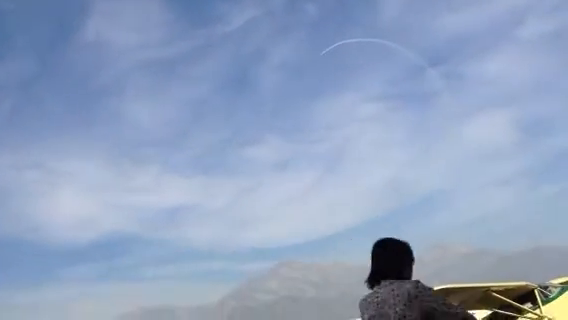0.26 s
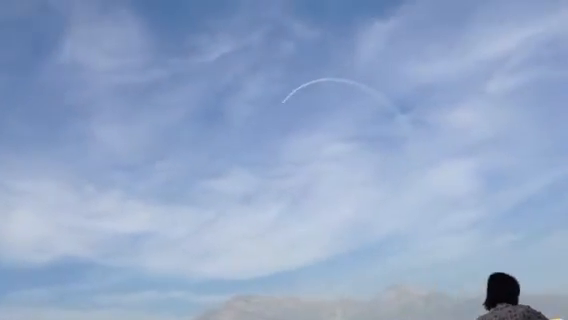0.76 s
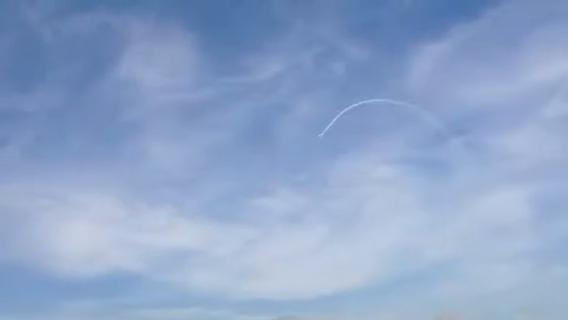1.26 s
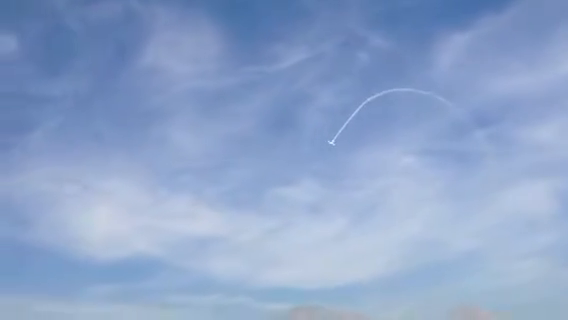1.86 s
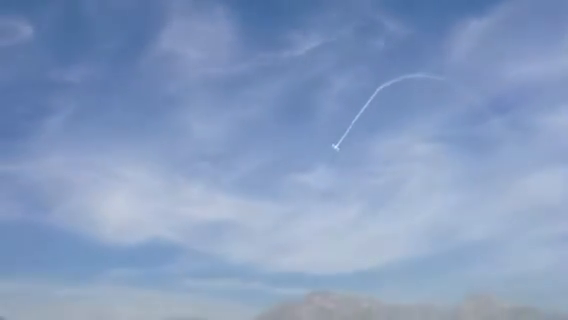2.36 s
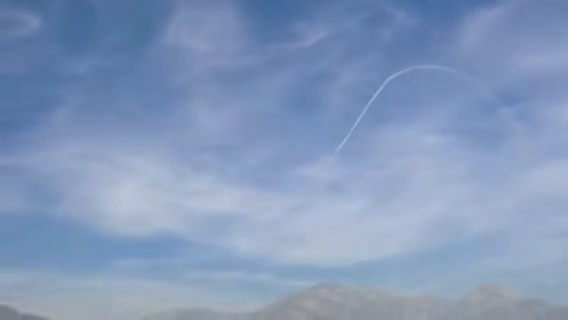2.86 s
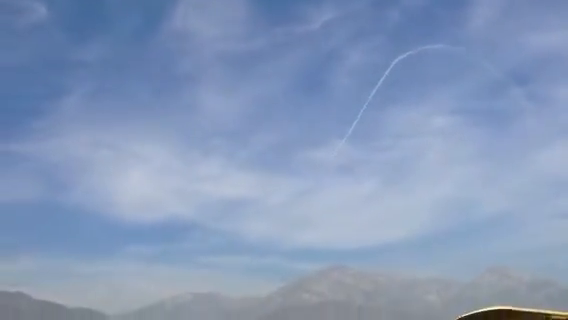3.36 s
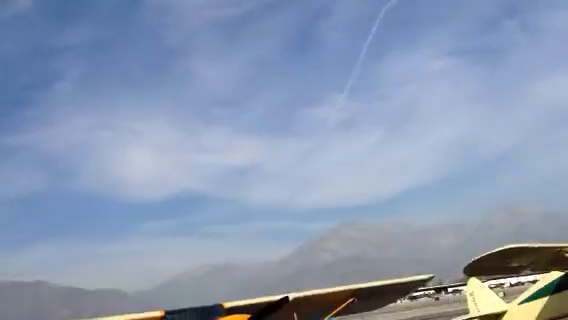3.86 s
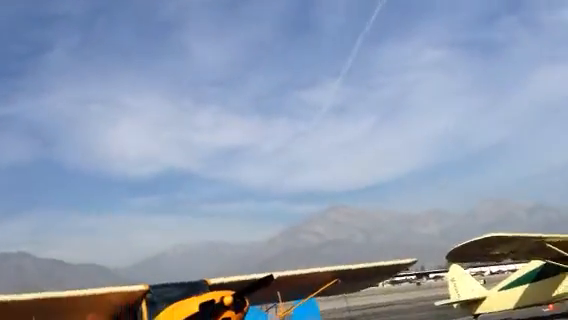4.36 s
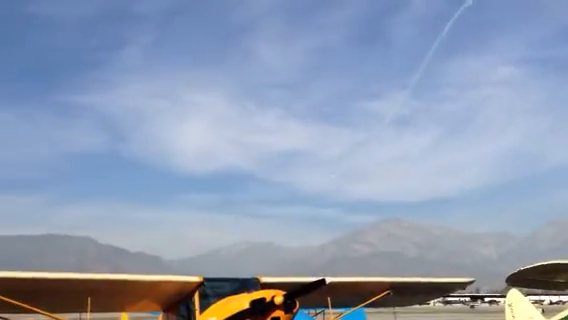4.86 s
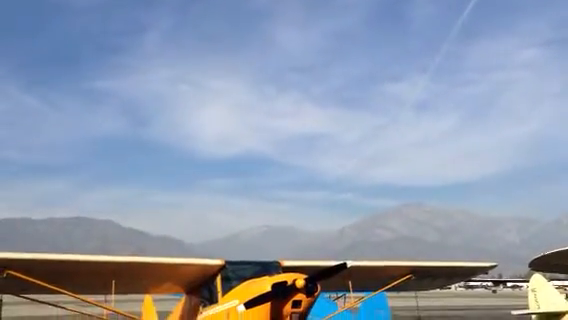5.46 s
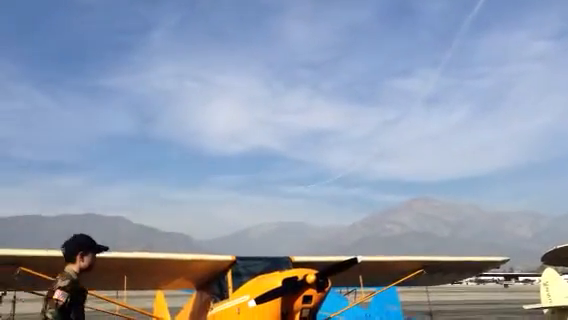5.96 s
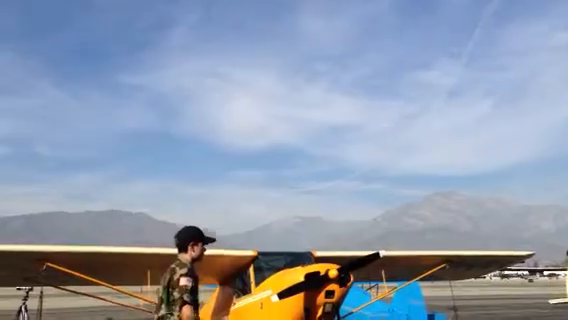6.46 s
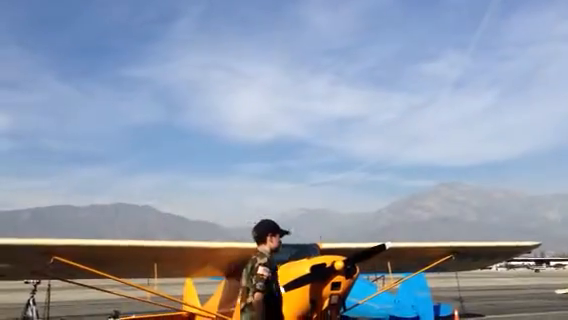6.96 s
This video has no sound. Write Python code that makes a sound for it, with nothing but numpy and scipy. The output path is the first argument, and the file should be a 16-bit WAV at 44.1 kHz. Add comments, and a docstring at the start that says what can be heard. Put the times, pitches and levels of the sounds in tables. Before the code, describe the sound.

Far-off radial engine growl with slapping propeller beats swells nearer, pitch climbing then sagging, fluttering in the wind above a quiet airfield rumble.

```python
"""An aerobatic propeller airplane dives out of a loop and comes nearer, heard from an airfield apron.
Far off the uneven exhaust of its radial engine throbs; nearer, the sharp pulses of the two blades take over.
Filtered clicks make blades and exhaust, noise makes the air rush, and sine tones make the low drone.
Two reflections sweep through as the airplane sinks; restless air and paths that add or cancel swell and fade it.
Around it lie a faint handling rustle with small ticks, the airfield's rumble and hiss, and a lumpy breeze."""
import sys
import numpy as np
from scipy import signal
from scipy.fft import rfft, irfft, next_fast_len
from scipy.io import wavfile
from scipy.ndimage import map_coordinates

SR = 44100
rng = np.random.default_rng(int(sys.argv[2]) if len(sys.argv) > 2 else 0)


def int16_out(signal):
    """Quantize to a 16-bit WAV file."""
    q = np.round(np.clip(np.atleast_2d(signal).T, -1, 1) * 32767)
    wavfile.write(sys.argv[1], SR, q.astype(np.int16))


N = 317961
T = np.arange(N) / SR  # time of every sample, s
SPLIT_HZ = 900  # where body and treble part, for the blade pulses and the reflections


def amp(db):
    """Decibels to gain."""
    return 10 ** (np.asarray(db) / 20)


def unit(x):
    """Scales to rms 1."""
    return x / np.sqrt(np.mean(x ** 2) + 1e-20)


def curves(rows):
    """Each column of a table after the first (time in s), drawn as straight lines at every sample."""
    times_s, *columns = np.transpose(rows)
    return [np.interp(T, times_s, column) for column in columns]


def wander(corner_hz):
    """Slow random drift of rms 1, falling off above the given rate."""
    hz = np.fft.rfftfreq(N, 1 / SR)
    spectrum = rfft(rng.standard_normal(N)) / (1 + (hz / corner_hz) ** 2)
    return unit(irfft(spectrum, N))


def colour(x, points):
    """Minimum-phase filter with the given spectrum: pulses keep a sharp front and ring afterwards."""
    size = next_fast_len(N + SR // 2)  # room for the ringing
    points_hz, points_db = np.transpose(points)
    hz = abs(np.fft.fftfreq(size, 1 / SR)) + 1
    gain_db = np.interp(np.log(hz), np.log(points_hz), points_db)
    log_gain = np.log(amp(gain_db))
    response = np.exp(np.conj(signal.hilbert(log_gain)))[:size // 2 + 1]
    return unit(irfft(rfft(x, size) * response, size)[:N])


def split(x, edge_hz):
    """The body and the treble of a sound; together they make the whole."""
    hz = np.fft.rfftfreq(N, 1 / SR)
    body = irfft(rfft(x) / (1 + (hz / edge_hz) ** 4), N)
    return body, x - body


def pulses(turns):
    """One click at each whole turn, shared between the two nearest samples."""
    at = np.flatnonzero(np.diff(np.floor(turns)) > 0)
    part = (np.floor(turns[at + 1]) - turns[at]) / (turns[at + 1] - turns[at])
    clicks = np.zeros(N)
    clicks[at], clicks[at + 1] = 1 - part, part
    return clicks


def puffs(clicks, decay_s):
    """A burst of noise that dies away exponentially after each click."""
    envelope = signal.lfilter([1], [1, -np.exp(-1 / (decay_s * SR))], clicks)
    return unit(envelope * rng.standard_normal(N))


def propeller(turns, hz, jitter_s=.00002, uneven_db=0.66, slap_at=0.53, slap_throb_db=4.5, crack_s=.004):
    """One pressure pulse per blade, nudged by eddies, plus a slap that swells and fades over
    every four blade passes: one hard, one soft, two between."""
    # spectrum of the blade pulse: pitch_hz, relative_db
    blade_spectrum = [(40, -43.5), (75, -49), (110, -6.5), (150, 5), (225, 1), (310, 3.5), (450, 7.5),
                      (700, -0.5), (1200, -2.5), (2200, -7), (2700, -21.5), (3400, -29.5), (4500, -45.5),
                      (7000, -64)]
    # spectrum of the blade slap: pitch_hz, relative_db
    slap_spectrum = [(100, -32.5), (300, -15.5), (430, 8.5), (620, 1.5), (800, -0.5), (1100, -2.5),
                     (1800, -13), (2500, -23.5), (3200, -34.5), (7000, -81.5)]
    # treble edge of the blade pulses against their body: time_s, edge_db
    blade_edge = [(0, -9.5), (1.5, -3), (1.8, -6), (3.4, -9.5), (3.9, -6.5), (5.7, 0.5), (6.2, -11.5),
                  (7.2, -7.5)]
    # the hardest slaps, each lifted within crack_s either side: time_s, extra_db
    cracks = [(.036, 3), (.095, 6), (.985, 6), (1.097, 4), (1.153, 3), (1.211, 4)]
    clicks = pulses(turns + hz * jitter_s * wander(36)) * amp(uneven_db * wander(20))
    body, edge = split(colour(clicks, blade_spectrum), SPLIT_HZ)
    thrum = body + amp(curves(blade_edge)[0]) * edge
    cycle = np.cos(2 * np.pi * (turns / 4 - slap_at))
    crack_db = sum(db * (abs(T - time_s) < crack_s) for time_s, db in cracks)
    slap = colour(clicks * amp(slap_throb_db * cycle + crack_db), slap_spectrum)
    return thrum, slap


def exhaust(turns, hz, jitter_s=.00004, uneven_db=3.5, boom_throb_db=6.5, bark_throb_db=8.0,
            throb_at=0.56, lag_turns=0.073):
    """Nine unequal firings in two crank turns (four blade passes): a low boom and a gassy bark, both throbbing."""
    # the nine cylinders in firing order: strength_db, lateness_ms of the puff
    cylinders = [(9, -1.6), (9.5, -.41), (0.5, 0.74), (-3, -0.197), (-6.5, 1.66), (-6.5, -1.484),
                 (0, 1.313), (5.5, 0.397), (8.5, .16)]
    # spectrum of the exhaust boom: pitch_hz, relative_db
    boom_spectrum = [(40, -73.5), (90, -37.5), (115, -25.5), (150, 5), (210, 15.5), (290, 7), (365, 9),
                     (440, -2.5), (520, -12.5), (650, -10), (1200, -33), (3000, -62)]
    # spectrum of the exhaust bark: pitch_hz, relative_db
    bark_spectrum = [(100, -53.5), (330, -10.5), (480, 8.5), (620, 6.5), (750, -7.5), (1000, -3),
                     (1600, -12.5), (2400, -11), (3000, -38), (4200, -61), (7000, -89)]
    boom_rough, bark_rough = .045, .2  # share of noisy gas beside the clean firings
    heard = turns - lag_turns + hz * jitter_s * wander(44)
    firings = np.zeros(N)
    for k, (strength_db, late_ms) in enumerate(cylinders):
        cylinder_cycle = (heard - hz * late_ms / 1000) / 4 - k / len(cylinders)
        firings += amp(strength_db) * pulses(cylinder_cycle)
    firings = unit(firings * amp(uneven_db * wander(170)))
    boom = colour(firings + boom_rough * puffs(firings, decay_s=0.019), boom_spectrum)
    bark = colour(firings + bark_rough * puffs(firings, decay_s=0.0043), bark_spectrum)
    cycle = np.cos(2 * np.pi * (turns / 4 - throb_at))
    return unit(boom * amp(boom_throb_db * cycle)), unit(bark * amp(bark_throb_db * cycle))


def rush(turns, decay_s=.004, crackle_db=2):
    """Turbulence shed by the blades: uneven noise puffs, one per blade pass, over a steadier hiss."""
    # hiss that does not pulse with the blades, against the puffs: time_s, share
    steady_share = [(0, .7), (1.2, .4), (1.7, .8), (3.4, .9), (4.2, .6), (7.2, .7)]
    # spectrum of the air rush: pitch_hz, relative_db
    rush_spectrum = [(40, -45), (100, -35), (160, -14), (300, -9), (600, 0), (1000, 3), (1700, 4),
                     (2400, 1), (2900, -7.5), (3500, -19), (4500, -38.5), (7000, -61.5)]
    clicks = pulses(turns) * amp(crackle_db * wander(19))
    steady = curves(steady_share)[0] * rng.standard_normal(N)
    return colour(puffs(clicks, decay_s) + steady, rush_spectrum)


def delayed(x, ms):
    """The sound after a path whose length changes."""
    return map_coordinates(x, [(T - ms / 1000) * SR], order=3)


def scatter(x, count=14, treble_above_hz=694, drift_hz=3.4, longest_ms=9):
    """Eddies send faint late copies of the treble that come and go: a rasp that fills the gaps between pulses."""
    # strength of each scattered copy, least over the top of the loop: time_s, share
    copy_share = [(0, .2), (.7, .2), (.95, .1), (1.45, .1), (1.7, .22), (4.2, .19), (7.2, .2)]
    _, treble = split(x, treble_above_hz)
    spread = (np.arange(count) + rng.random(count)) / count
    delays_ms = longest_ms * spread ** 1.5  # crowded toward the short delays
    copies = sum(wander(drift_hz) * np.roll(treble, int(ms * SR / 1000)) for ms in delays_ms)
    return curves(copy_share)[0] * copies


def reflections(x, ground=0.68, nearby=0.5, twinkle_db=2.0, waver_ms=.015, dull_hz=1700):
    """Pulses arrive direct and off the hard apron, with twinkling treble; a nearby surface adds a dull copy."""
    # reflection delays and how the two paths share the treble:
    # time_s, ground_ms, nearby_ms, lean_db (treble of the ground path over the direct one)
    echoes = [(0.0, 2.8, 1.6, -3), (1.35, 2.95, 1.7, 0), (2.3, 3.05, 1.95, -3), (3.4, 2.9, 2.2, -3),
              (4.1, 2.8, 2.3, -2), (4.45, 2.7, 2.33, 9), (4.85, 2.48, 2.42, 6), (5.2, 2.35, 2.5, 0),
              (5.7, 2.12, 2.6, 3), (6.3, 1.85, 2.75, -4), (6.8, 1.65, 3.05, -3), (7.2, 1.63, 3.12, -3)]
    ground_ms, nearby_ms, lean_db = curves(echoes)
    body, treble = split(x, SPLIT_HZ)
    direct = body + treble * amp(twinkle_db * wander(4.8) - lean_db / 2)
    bounced = body + treble * amp(twinkle_db * wander(3.2) + lean_db / 2)
    both = direct + ground * delayed(bounced, ground_ms + waver_ms * wander(9.9))
    dull, _ = split(both, dull_hz)
    return both + nearby * delayed(dull, nearby_ms) + scatter(both)


def approach_and_swells(x, steepness=6.3, flutter_db=1.2, bass_hz=231, treble_hz=1095):
    """A slow trend sets level and tone, and the treble flutters;
    each swell or fade is a flat-topped rise or dip in time, rounded around a pitch."""
    # the trend as the airplane comes nearer: time_s, level_db, bass_lift_db, treble_lift_db
    approach = [(0.0, -37.5, 18.5, -15), (0.5, -38, 14, -24.5), (1.0, -32.5, 1, -5), (1.8, -30, -5, -18),
                (2.55, -31.5, 5, -19.5), (2.8, -28.5, -16, -28), (3.15, -36, 5.5, -19.5),
                (3.5, -31, -4, -17), (3.95, -29.5, 0.5, -14.5), (4.2, -27, 2.5, -6), (4.5, -24.5, 7.5, -6),
                (5.5, -28.5, 6.5, -1.5), (5.85, -23.5, 4.5, -3.5), (6.5, -21, 2, -6),
                (7.2, -22.5, 5.5, -14.5)]
    # swells and fades of the airplane's sound; the narrow ones lift or sink a single overtone,
    # as when reflected paths add or cancel:
    # middle_s, length_s (between half-dB points), peak_db, centre_hz, spread_octaves
    swells = [(0.115, 0.15, 9.5, 645, 0.56), (0.15, 0.95, 17, 278, 0.07), (.1, 0.78, 26, 318, 0.041),
              (0.59, 0.089, 16.5, 2170, 0.87), (0.802, 0.95, -11, 350, 0.043), (1.083, 0.35, 7, 548, 0.17),
              (0.967, 0.21, 7, 564, 0.38), (.35, 0.23, 6.5, 540, 0.086), (0.793, .2, 6.5, 1305, 0.37),
              (1.19, .2, 2.5, 2050, .5), (1.25, .2, -5.5, 241, 0.25), (1.636, 1, -4.5, 703, 0.1),
              (1.85, 0.22, 10.5, 145, 0.37), (1.19, 0.25, 11, 920, 0.79), (1.405, 0.18, 12.5, 1650, 0.94),
              (1.614, 0.15, -9, 990, 0.62), (1.885, 0.13, 9, 1920, 0.83), (1.996, 0.11, 6, 825, 0.67),
              (2.3, 0.15, 9, 2330, 0.21), (2.75, 0.73, 5.5, 2320, 0.13), (2.357, 0.2, 1, 1220, 0.61),
              (2.744, 0.35, -12, 980, 0.47), (2.747, 1, 1, 383, 0.018), (3.334, 0.14, 6.5, 960, 0.91),
              (3.42, 0.18, 10, 398, 0.042), (3.637, 0.36, 7.5, 310, 0.07), (3.793, 0.3, 6.5, 1570, 0.43),
              (3.693, .8, 8, 144, 0.13), (3.9, 0.37, -15.5, 318, 0.039), (4.011, 0.085, 10, 1580, 0.6),
              (4.301, 0.11, 10.5, 1460, 0.94), (4.551, 0.17, 11, 946, 0.39), (4.581, 0.067, 8.5, 2800, 0.7),
              (4.814, 0.11, 7, 773, 0.35), (4.8, 0.29, 8, 1690, 0.41), (4.885, 0.061, 4, 1385, 0.62),
              (5.016, 0.057, 11, 792, 0.05), (4.7, .2, -6, 358, .3), (4.847, 0.5, 2, 3035, 0.42),
              (4.944, .2, 3, 1375, 0.37), (5.046, 0.79, 5, 353, 0.81), (5.047, 0.078, -4.5, 1560, 0.51),
              (5.255, 0.23, 7, 870, 0.11), (5.404, 0.15, 5, 1920, 0.26), (5.432, 0.42, 12, 520, 0.049),
              (5.666, 0.11, 9.5, 1620, 0.95), (5.72, 0.54, 2, 1150, 0.15), (5.7, 0.96, 5.5, 684, 0.097),
              (6.03, 0.062, 4, 1570, 0.26), (6.2, 0.22, -4.5, 1110, 0.084), (5.774, 0.042, 8.5, 2750, 0.77),
              (5.76, 0.12, 4, 422, 0.9), (5.94, 0.082, 12.5, 2770, 0.7), (5.933, 0.29, -8, 278.6, 0.2),
              (6.22, 0.05, 3.5, 2500, 0.42), (6.352, 0.1, 9.5, 847, 0.24), (6.375, 0.16, -14.5, 294, 0.2),
              (6.398, 1, 11, 646, 0.027), (6.633, 0.082, 3.5, 566, 0.47), (6.78, 0.15, -12.5, 540, 0.2),
              (6.88, 1, 12.5, 289, 0.057), (6.927, 0.12, 7, 2260, 0.75), (7.066, 0.3, -20, 358, 0.066),
              (7.186, 0.15, 10.5, 2200, 0.64)]
    hz, t, z = signal.stft(x, SR, nperseg=2048, noverlap=1792)
    hz = hz[:, None] + 1
    trend_curves = curves(approach) + [wander(5.8)]
    level_db, bass_db, treble_db, flutter = [np.interp(t, T, c) for c in trend_curves]
    bass = 1 / (1 + (hz / bass_hz) ** 8)
    treble = 1 / (1 + (treble_hz / hz) ** 3)
    trend_db = level_db + bass * bass_db + treble * (treble_db + flutter_db * flutter)
    middle_s, length_s, peak_db, centre_hz, octaves = np.transpose(swells)
    in_time = .5 ** (abs(2 * (t[:, None] - middle_s) / length_s) ** steepness)
    in_pitch = np.exp(-.5 * (np.log2(hz / centre_hz) / octaves) ** 2)
    swell_db = (peak_db * in_pitch) @ in_time.T
    return signal.istft(z * amp(trend_db + swell_db), SR, nperseg=2048, noverlap=1792)[1][:N]


def drone(turns, waver_db=3.5):
    """The lowest engine tones carry cleanly through the air and glide with the shaft."""
    # level of the whole drone: time_s, level_db
    drone_level = [(0, -42), (.7, -44.5), (2.6, -45.5), (3.3, -50), (4.2, -46), (5, -47), (7.2, -65)]
    # its tones: multiple of the firing cycle, relative_db
    drone_tones = [(8, -4), (11, 0.5), (14, -8.5)]
    cycles = turns / 4  # one firing cycle lasts four blade passes
    tones = np.zeros(N)
    for multiple, db in drone_tones:
        tones += amp(db + waver_db * wander(6.7)) * np.sin(2 * np.pi * round(multiple) * cycles)
    return amp(curves(drone_level)[0]) * unit(tones)


def airplane(first_blade_turn=.4):
    """Blades and engine turn on one shaft; their pulses take several paths, the diffuse rush fills in between."""
    # blade passing rate as heard, Doppler shift included: time_s, rate_hz
    blade_rate = [(0.0, 66.8), (0.25, 67.45), (0.56, 68.88), (1.4, 71.7), (2.25, 75.22), (2.7, 76.78),
                  (3.3, 78.58), (3.6, 79.2), (4.05, 79.1), (4.5, 78.45), (4.91, 77.26), (5.92, 74.99),
                  (6.1, 74.37), (6.6, 73.72), (6.76, 73.75), (7.2, 72.85)]
    # what is beamed toward the listener, against the blade pulses: time_s, boom_db, bark_db
    aspect = [(0, -6, 3), (.6, -2, 4), (1.15, 12.5, 4.5), (1.45, -1, 8), (1.6, 2, 7.5), (2.1, 5.5, 4),
              (2.8, 4, -1.5), (3.6, -3.5, -9), (4.2, -11, -16), (4.9, -6, -8.5), (5.6, -9.5, -19),
              (6.3, -19, -13.5), (7.2, -23, -13.5)]
    # blade slap against the blade pulses, hardest over the top of the loop: time_s, slap_db
    slap_level = [(0, -2), (.15, -2), (.3, -14), (.75, -6), (1.15, 6), (1.46, 7), (1.52, -8), (1.9, 0),
                  (2.2, -8), (3.6, -24), (5.6, -25), (6.3, -15), (7.2, -15)]
    # air rush against the blade pulses: time_s, rush_db
    rush_level = [(0, -5), (1.15, -5), (1.6, 1), (2.1, -1), (2.8, -4), (3.4, -9), (4.3, -9), (5.6, -9.5),
                  (6.3, -8), (7.2, -7)]
    hz, = curves(blade_rate)
    turns = np.cumsum(hz) / SR - first_blade_turn  # counted in blade passes
    gains = amp(curves(aspect) + curves(slap_level))
    boom_gain, bark_gain, slap_gain = gains
    rush_gain = amp(curves(rush_level)[0])
    thrum, slap = propeller(turns, hz)
    boom, bark = exhaust(turns, hz)
    beats = reflections(thrum + boom_gain * boom + bark_gain * bark + slap_gain * slap)
    total = np.sqrt(1 + (gains ** 2).sum(0))  # evens out the mix before the trend sets its level
    return approach_and_swells((beats + rush_gain * rush(turns)) / total) + drone(turns)


def handling(grain_db=3, count=9, decay_s=.0018, width_hz=2000):
    """A faint grainy noise rustle and a few small ticks by the microphone, each a cluster of short modes."""
    # level of the rustle: time_s, level_db
    rustle_level = [(0, -65.5), (.3, -66), (.7, -72.5), (1.1, -73), (2, -92), (7.2, -103.5)]
    # spectrum of the rustle: pitch_hz, relative_db
    rustle_spectrum = [(2000, -22), (3500, -3.5), (5200, 0.5), (7500, -9.5), (9300, 1.5), (12000, -9),
                       (15000, -4)]
    # small ticks close by: start_s, peak_db, centre_hz
    ticks = [(.826, -46, 5900), (.972, -48, 5900), (1.472, -51, 6300), (3.956, -49, 4200)]
    grains = rng.standard_normal(N) * amp(grain_db * wander(70))
    out = amp(curves(rustle_level)[0]) * colour(grains, rustle_spectrum)
    t = np.arange(0, 8 * decay_s, 1 / SR)
    for start_s, peak_db, centre_hz in ticks:
        offsets = np.linspace(-.5, .5, count) + rng.uniform(-0.56, .5, count) / count
        modes_hz = centre_hz + width_hz * offsets
        modes = np.sin(2 * np.pi * (modes_hz * t[:, None] + rng.random(count)))
        ring = modes.sum(1) * np.exp(-t / decay_s)
        out[round(start_s * SR):][:len(t)] += amp(peak_db) * ring / abs(ring).max()
    return out


def airfield_floor(level_db=-48):
    """Steady coloured noise: the airfield's low rumble and a thin hiss."""
    # spectrum of the floor: pitch_hz, relative_db
    floor_spectrum = [(20, -16), (45, -22.5), (70, 4.5), (100, 2), (160, 12), (400, -2), (1000, 3.5),
                      (2500, -11), (3600, -24.5), (6000, -27), (10000, -29.5), (15000, -29)]
    return amp(level_db) * colour(rng.standard_normal(N), floor_spectrum)


def breeze(gust_db=3.0):
    """Low noise of a lumpy breeze at the microphone, its level drifting in gusts."""
    # level of the breeze: time_s, level_db
    breeze_level = [(0, -87), (1.2, -57), (2, -86), (3.5, -76), (5.7, -72.5), (6.2, -62), (7.2, -56)]
    # spectrum of the breeze: pitch_hz, relative_db
    breeze_spectrum = [(15, -26), (35, -10.5), (60, 6.5), (90, 0), (200, -37.5), (600, -44.5)]
    gusts = amp(curves(breeze_level)[0] + gust_db * wander(6))
    return gusts * colour(rng.standard_normal(N), breeze_spectrum)


def scene():
    """The airplane and the handling noise over the airfield's floor and a light breeze."""
    return (airplane() + handling() + airfield_floor() + breeze())[None]


def record(dry, edge_hz=15300):
    """The recorder's band limit: a steep low-pass."""
    low_pass = signal.firwin(511, edge_hz, window=("kaiser", 9), fs=SR)
    return signal.oaconvolve(dry, low_pass[None], "same")


dry = scene()
out = record(dry)
int16_out(out)
```